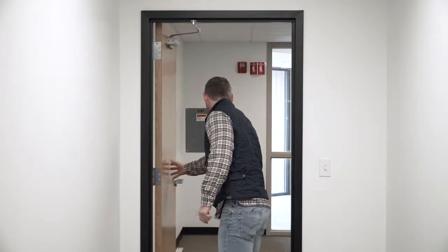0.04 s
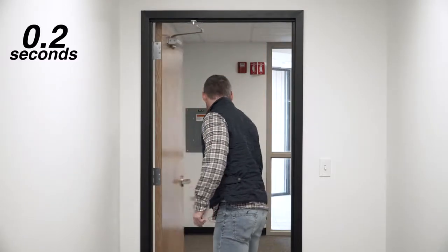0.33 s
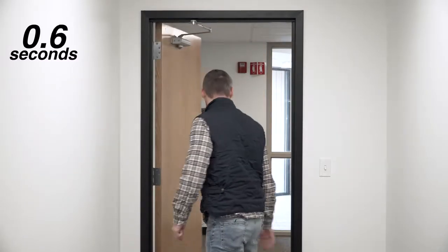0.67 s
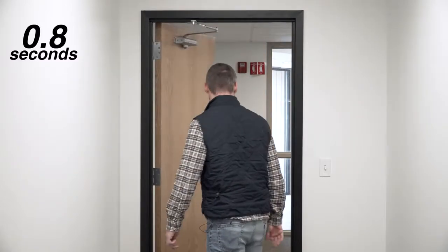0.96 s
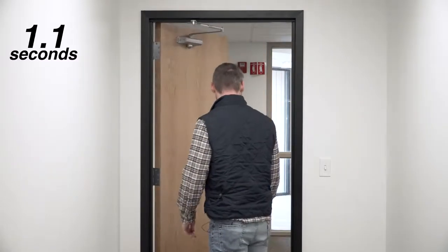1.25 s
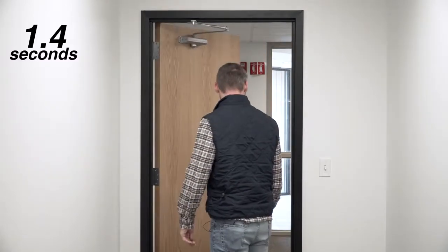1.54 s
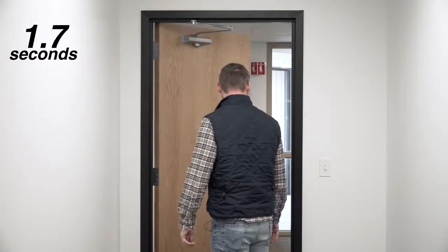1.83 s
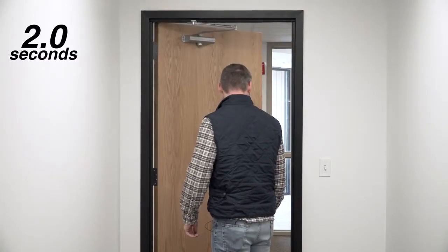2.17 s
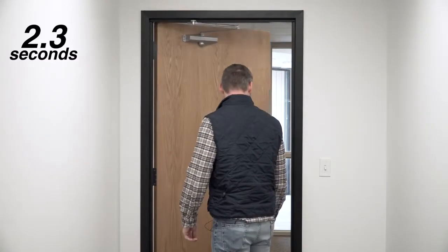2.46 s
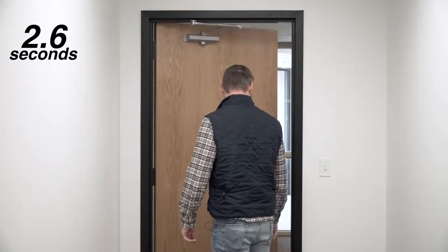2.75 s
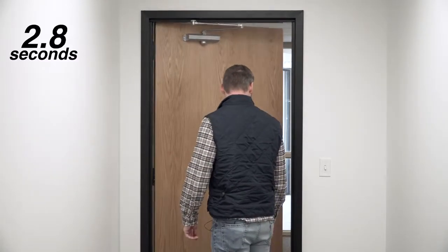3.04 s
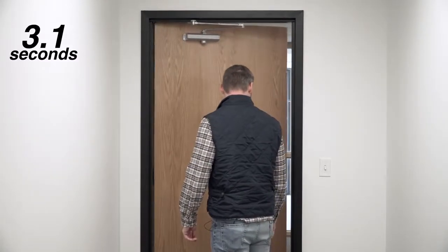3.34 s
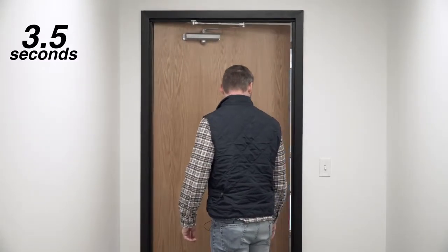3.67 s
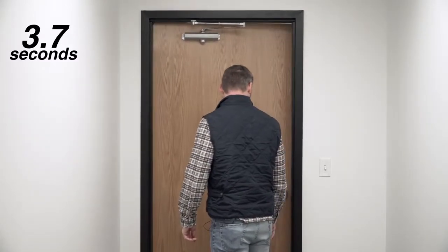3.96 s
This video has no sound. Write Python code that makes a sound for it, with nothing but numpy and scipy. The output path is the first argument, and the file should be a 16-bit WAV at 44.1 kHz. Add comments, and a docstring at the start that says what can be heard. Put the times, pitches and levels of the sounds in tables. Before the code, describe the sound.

A door slowly swings shut over a steady low ventilation rumble. Around 0.5 seconds clothing rustles with tiny zip clinks, followed by a soft footstep and shoe scuff near 1 second. From 1.1 to 2.8 seconds the door closer rubs and ticks faintly. Light latch clicks start near 2.9 seconds, clearest around 3.7, with a very faint high whistle as the hallway's air noise fades.

```python
"""A door closer draws an office door slowly shut: friction makes it rub, its hydraulic fluid hisses in a faint
whistle, its arm ticks, and the latch rings against the frame. The man who lets go of the door brushes his vest
with a sleeve, sets a foot down and scuffs a shoe; sliding contact gives noise, impacts excite resonances.
Ventilation rumbles throughout, and the air noise of the hallway fades as the gap narrows."""
import sys
import numpy as np
from scipy import signal
from scipy.fft import rfft, irfft
from scipy.io import wavfile
from scipy.ndimage import uniform_filter1d

SR = 44100
rng = np.random.default_rng(int(sys.argv[2]) if len(sys.argv) > 2 else 0)


def file_out(sig):
    """Save sig as 16-bit WAV at sys.argv[1]."""
    # one column per channel
    cols = np.atleast_2d(sig).T
    # limit, then scale
    lim = np.clip(cols, -1, 1)
    pcm = np.round(lim * 32767).astype(np.int16)
    wavfile.write(sys.argv[1], SR, pcm)


N = 176400
T = np.arange(N) / SR
HZ = np.maximum(np.fft.rfftfreq(N, 1 / SR), 1)

# duct rumble in the room: frequency_hz, density_db
DUCT_SPECTRUM = [(8, -75.5), (23, -62.5), (31, -64), (38, -63.5), (45, -68.5), (53, -62.5), (68, -67.5),
                 (77, -67.5), (88, -72), (110, -79.5), (145, -78.5), (200, -84), (330, -90), (500, -92.5),
                 (900, -100), (1400, -102), (2000, -109), (3000, -112), (5000, -121), (16000, -135)]
# fan tones: pitch_hz, rms_db
FAN_PARTIALS = [(29.8, -53.5), (78.3, -51), (120, -64), (139, -69), (159, -70.5), (359, -71.5)]
# hallway air with the door wide open: frequency_hz, density_db
HALLWAY_SPECTRUM = [(90, -76.5), (140, -77), (200, -84.5), (290, -82), (480, -88), (700, -93.5),
                    (950, -97.5), (1450, -99.5), (2000, -105), (3000, -109), (5000, -118), (9000, -130)]
# its transmission through the door gap: time_s, gain_db
GAP_GAIN = [(0, -1.5), (.6, 0.5), (1.4, 0), (2.6, -3), (3.3, -6), (3.7, -9.5), (4, -16)]
# narrow resonances of the space: centre_hz, width_hz, boost_db
ROOM_MODES = [(263, 8.2, 2.5), (303, 12, 2.5), (493, 15, 4), (844, 7.6, 7.5)]
# stereo width of the air noise: frequency_hz, side_minus_mid_db
AIR_WIDTH = [(28, -38), (82, -27), (130, -13.5), (350, -9.5), (750, -5.5), (1050, -6), (1250, -2.5),
             (1900, -5.5), (3000, -6.5), (6000, -18)]

# tiny dry snaps: start_s, level_db
SNAP_IMPULSES = [(.518, -57), (.5445, -50), (.5625, -52), (.5865, -49), (0.64, -46), (2.884, -46)]
# sleeve strokes: start_s, rise_s, hold_s, fall_s, gain_db
SLEEVE_STROKES = [(0.632, 0.14, 0.11, .15, -0.5), (0.458, 0.082, 0.024, 0.068, -5.5)]
# sleeve friction: frequency_hz, density_db
SLEEVE_SPECTRUM = [(250, -86), (600, -93.5), (1300, -92.5), (2000, -102), (4400, -101), (5300, -103),
                   (6400, -101), (8000, -108), (15000, -118)]
# the arm sliding lightly down the vest: time_s, gain_db
SLIDE_GAIN = [(0, -2.5), (.15, -9.5), (.34, 1), (.43, -1), (.5, -4), (.7, -7), (1.0, -2), (1.25, -33)]
# friction of that slide: frequency_hz, density_db
SLIDE_SPECTRUM = [(900, -106), (2000, -109), (4000, -111), (5200, -111), (6400, -105), (8000, -115),
                  (10500, -115), (15000, -125)]
# knocks of the vest's fastenings as he turns: start_s, gain_db
FASTENING_HITS = [(.535, -2), (.554, -3), (.561, -1), (.588, 2.5), (.639, 2.5)]
# their closely packed resonances: frequency_hz, density_db
FASTENING_SPECTRUM = [(900, -104), (1550, -87), (2350, -94.5), (2800, -99), (3450, -91), (4300, -102),
                      (8700, -112), (11000, -107), (15000, -120)]
# clinks of the zip pull: start_s, level_db
ZIP_HITS = [(.4675, -67), (.586, -61), (.6162, -62), (.6388, -57), (.6447, -65)]
# its modes: frequency_hz, gain_db, t60_s
ZIP_MODES = [(7960, -3.5, .028), (8080, -1, 0.013), (11940, -6, .01)]

# a light shift of weight, then heel and sole: start_s, rise_s, hold_s, fall_s, gain_db
FOOT_STROKES = [(.533, 0.0014, 0.004, .006, -13.5), (.906, 0.0059, 0.023, 0.028, -2),
                (.945, 0.022, 0.0089, 0.061, -10.5)]
# thud of the floor: frequency_hz, density_db
FLOOR_SPECTRUM = [(150, -106), (270, -71.5), (350, -70.5), (530, -76.5), (690, -72), (850, -79),
                  (1100, -88), (1500, -89.5), (2500, -101), (5000, -115)]
# its sharper resonances: centre_hz, width_hz, boost_db
FLOOR_MODES = [(338, 38, 5.5), (523, 27, 11), (668, 59, 7), (1055, 60, 4)]
# shoe scuffs: start_s, rise_s, hold_s, fall_s, gain_db
SCUFF_STROKES = [(1.02, 0.0085, 0.012, 0.052, -3.5), (1.054, 0.016, 0.027, 0.041, -2)]
# sole friction: frequency_hz, density_db
SOLE_SPECTRUM = [(500, -104), (1500, -90.5), (1900, -99), (2250, -94), (2550, -99), (3000, -94.5),
                 (6000, -99), (8000, -107), (15000, -118)]
# chirps of gripping rubber: start_s, rise_s, hold_s, fall_s, rms_db, pitch_hz
SQUEAK_STROKES = [(0.464, .004, 0.012, .008, -60.5, 1400), (.941, .003, .004, .004, -58, 1480),
                  (1.055, .004, 0.023, 0.041, -62.5, 1580)]

# the course of the closer's rubbing: time_s, gain_db
CLOSER_GAIN = [(1.05, -19), (1.27, -7), (1.34, -1.5), (1.47, -3.5), (1.56, -12), (1.7, -7), (2.1, -10.5),
               (2.25, -23), (2.52, -8.5), (2.8, -24)]
# closer friction: frequency_hz, density_db
CLOSER_SPECTRUM = [(600, -101), (1400, -99), (2000, -108), (2420, -97), (2700, -106), (3100, -103),
                   (4000, -111), (4900, -109), (6000, -121), (10000, -129)]
# the closer's high whistle near the end: start_s, rise_s, hold_s, fall_s, density_db
WHISTLE_STROKES = [(3.05, .2, 0.42, .15, -120)]
# ticks of the closer arm: start_s, gain_db
ARM_HITS = [(1.14, -1.5), (1.236, -5), (1.317, -8), (1.401, -1), (1.443, -7), (1.522, -1.5), (1.919, -2.5),
            (1.961, 0.5), (2.024, -3.5), (2.078, -5), (2.14, 0.5)]
# its resonances: frequency_hz, density_db
ARM_SPECTRUM = [(1700, -108), (2350, -88.5), (2750, -101), (3150, -97.5), (4300, -107), (4950, -98),
                (5600, -116)]
# latch and hinge ticks: start_s, gain_db
LATCH_HITS = [(2.883, -1), (3.092, -2), (3.436, -2), (3.6805, 4), (3.698, -1), (3.704, -16), (3.775, 3.5),
              (3.783, -8), (3.8155, -1), (3.855, -5)]
# resonances of door and frame: frequency_hz, density_db
FRAME_SPECTRUM = [(650, -104), (1100, -94.5), (1600, -93.5), (2200, -96.5), (2700, -102), (3250, -99.5),
                  (4500, -116), (8100, -114), (14000, -122)]
# modes of the latch bolt: frequency_hz, level_db, t60_s
BOLT_MODES = [(1700, -71, .035), (3240, -65, 0.024), (5570, -59, .002)]


def from_db(db):
    """Amplitude grows tenfold for every 20 dB."""
    return 10 ** (np.asarray(db) / 20)


def spectrum(points):
    """A spectral envelope in dB, interpolated over log frequency."""
    hz, db = np.transpose(points)
    return np.interp(np.log(HZ), np.log(hz), db)


def resonances(modes):
    """Each resonance adds a bell-shaped boost in dB about its centre."""
    return sum(db / (1 + (2 * (HZ - hz) / width) ** 2) for hz, width, db in modes)


def envelope(points):
    """An amplitude envelope, interpolated in decibels."""
    return from_db(np.interp(T, *np.transpose(points)))


def strokes(rows):
    """Superposed trapezoidal envelopes: each rises, holds and falls."""
    return sum(from_db(db) * np.interp(T, start + np.cumsum([0, rise, hold, fall]), [0, 1, 1, 0])
               for start, rise, hold, fall, db in rows)


def drift(rate_hz):
    """Low-passed noise gives a random fluctuation of unit variance."""
    slow = irfft(rfft(rng.standard_normal(N)) / (1 + (HZ / rate_hz) ** 2), N)
    return slow / slow.std()


def noise(density_db, side_db=-40):
    """Mid-side noise of a given density per Hz; a weak side signal places it straight ahead."""
    spectra = rfft(rng.standard_normal((2, N))) * from_db(density_db) * np.sqrt(SR / 2)
    mid = irfft(spectra[0], N)
    side = irfft(spectra[1] * from_db(side_db), N)
    return np.array([mid + side, mid - side])


def grainy_noise(density_db, grain_db, grain_hz):
    """Random amplitude modulation gives noise the grain of surfaces that catch and slip."""
    return noise(density_db) * from_db(grain_db * drift(grain_hz))


def impulses(hits):
    """An ideal impact lasts a single sample."""
    train = np.zeros(N)
    for start, db in hits:
        train[int(start * SR)] = from_db(db)
    return train


def dense_ring(hits, body, t60_1khz_s, rise_s=0.00037):
    """Closely packed modes ring as decaying noise after an impact; higher octaves die sooner."""
    ringing = rfft(noise(spectrum(body)))
    force = uniform_filter1d(impulses(hits), int(rise_s * SR)) + 1e-18
    octaves_above_1khz = np.clip(np.log2(HZ / 1000), 0, 4)
    out = 0
    for octave in range(5):
        band = np.maximum(1 - np.abs(octaves_above_1khz - octave), 0)
        t60 = t60_1khz_s / 2 ** (0.29 * octave)
        pole = np.exp(-np.log(1000) / (t60 * SR))
        decay = signal.lfilter([1], [1, -pole], force)
        out = out + irfft(ringing * band, N) * decay
    return out


def modal_ring(hits, modes):
    """A small struck metal part vibrates freely as a sum of damped sinusoids."""
    out = np.zeros(N)
    for start_s, hit_db in hits:
        start = int(start_s * SR)
        t = T[:min(SR // 4, N - start)]
        for hz, mode_db, t60 in modes:
            decay = from_db(hit_db + mode_db - 60 * t / t60)
            out[start:start + len(t)] += decay * np.sin(2 * np.pi * hz * t)
    return out


def air_noise(points):
    """The resonances of the space colour broadband airflow noise."""
    return noise(spectrum(points) + resonances(ROOM_MODES), spectrum(AIR_WIDTH))


def ventilation(wander_hz=1.38, flutter_db=2):
    """Duct flow gives rumble; the fan's periodic motion adds tones, wavering in pitch and level."""
    air = air_noise(DUCT_SPECTRUM)
    for hz, db in FAN_PARTIALS:
        phase = 2 * np.pi * np.cumsum(hz + wander_hz * drift(3.67)) / SR
        air += np.sqrt(2) * from_db(db + flutter_db * drift(18)) * np.sin(phase)
    return air


def hallway():
    """A narrowing aperture transmits less of the air noise beyond it."""
    return envelope(GAP_GAIN) * air_noise(HALLWAY_SPECTRUM)


def snaps(cutoff_hz=4500):
    """High-passed impulses are heard as bright clicks with no ring."""
    highpass = signal.butter(1, cutoff_hz, "high", fs=SR, output="sos")
    return signal.sosfilt(highpass, impulses(SNAP_IMPULSES) + 1e-18)


def cloth():
    """Sliding friction between sleeve and vest radiates grainy noise."""
    brush = grainy_noise(spectrum(SLEEVE_SPECTRUM), grain_db=1.5, grain_hz=250)
    slide = grainy_noise(spectrum(SLIDE_SPECTRUM), grain_db=1.5, grain_hz=120)
    return strokes(SLEEVE_STROKES) * brush + envelope(SLIDE_GAIN) * slide


def fastenings():
    """Light impacts excite the modes of the vest's fastenings and zip pull."""
    jingle = dense_ring(FASTENING_HITS, FASTENING_SPECTRUM, t60_1khz_s=0.053)
    return jingle + modal_ring(ZIP_HITS, ZIP_MODES)


def footsteps():
    """The foot's impact drives the floor's resonances; friction of the sole adds scuffs."""
    floor_db = spectrum(FLOOR_SPECTRUM) + resonances(FLOOR_MODES)
    thud = grainy_noise(floor_db, grain_db=1.0, grain_hz=120)
    scuff = grainy_noise(spectrum(SOLE_SPECTRUM), grain_db=-1.5, grain_hz=420)
    return strokes(FOOT_STROKES) * thud + strokes(SCUFF_STROKES) * scuff


def squeaks(wander_hz=91, roughness_db=1):
    """Stick-slip oscillation of the rubber sole gives short tones of unsteady pitch."""
    wander = wander_hz * drift(150)
    roughness = from_db(roughness_db * drift(200))
    chirps = sum(strokes([stroke]) * np.sin(2 * np.pi * np.cumsum(hz + wander) / SR)
                 for *stroke, hz in SQUEAK_STROKES)
    return np.sqrt(2) * roughness * chirps


def door_closer(whistle_hz=8200, whistle_width_hz=520):
    """Friction gives broadband rubbing; the hydraulic fluid hisses in a broken narrowband whistle; ticks set
    the arm ringing."""
    rub = envelope(CLOSER_GAIN) * grainy_noise(spectrum(CLOSER_SPECTRUM), grain_db=3.5, grain_hz=57)
    band_db = -10 * np.log10(1 + (2 * (HZ - whistle_hz) / whistle_width_hz) ** 4)
    whistle = strokes(WHISTLE_STROKES) * grainy_noise(band_db, grain_db=7.0, grain_hz=28)
    return rub + whistle + dense_ring(ARM_HITS, ARM_SPECTRUM, t60_1khz_s=0.11)


def door_latch():
    """Each contact excites the dense modes of door and frame and the few modes of the bolt."""
    frame = dense_ring(LATCH_HITS, FRAME_SPECTRUM, t60_1khz_s=0.099)
    return frame + modal_ring(LATCH_HITS, BOLT_MODES)


def scene():
    """Sound pressures superpose: man and door straight ahead, over the wider air noise."""
    background = ventilation() + hallway()
    man = cloth() + fastenings() + footsteps() + squeaks()
    return background + snaps() + man + door_closer() + door_latch()


def record(dry, cutoff_hz=15700):
    """Microphone self-noise adds white hiss, and a steep low-pass limits the bandwidth."""
    hiss = noise(density_db=-117.8, side_db=-3.5)
    lowpass = signal.ellip(12, .1, 70, cutoff_hz, fs=SR, output="sos")
    return signal.sosfilt(lowpass, dry + hiss)


dry = scene()
out = record(dry)
file_out(out)
```